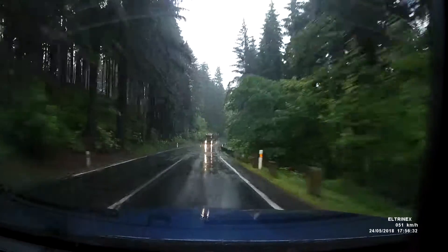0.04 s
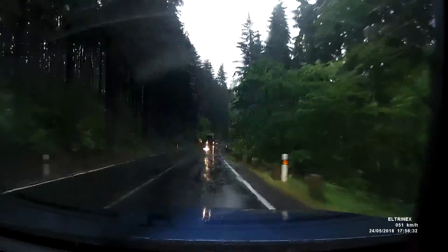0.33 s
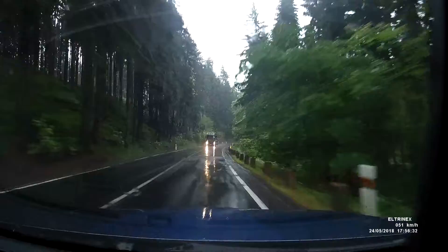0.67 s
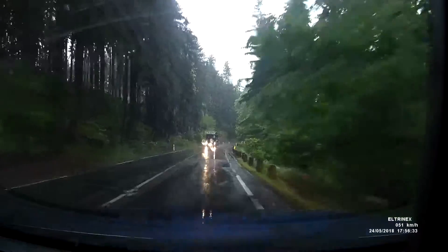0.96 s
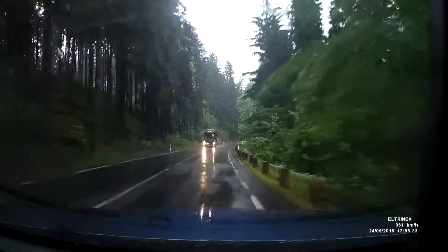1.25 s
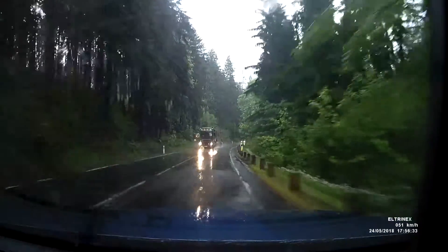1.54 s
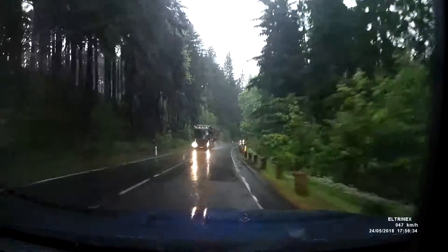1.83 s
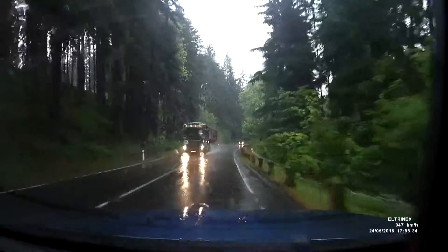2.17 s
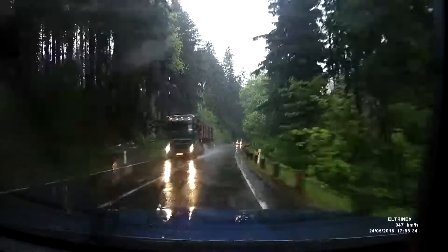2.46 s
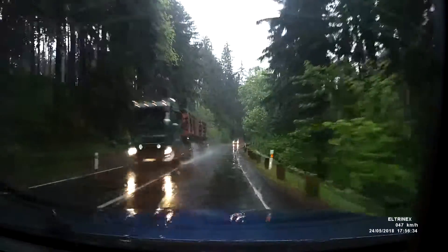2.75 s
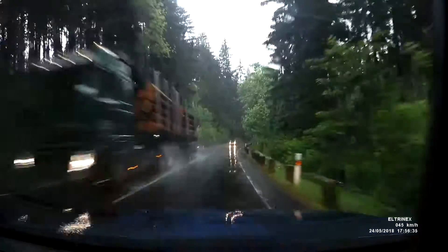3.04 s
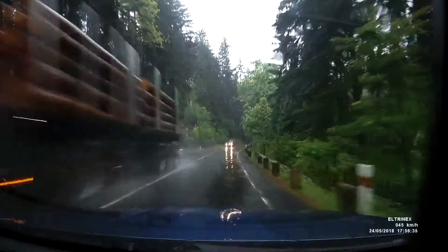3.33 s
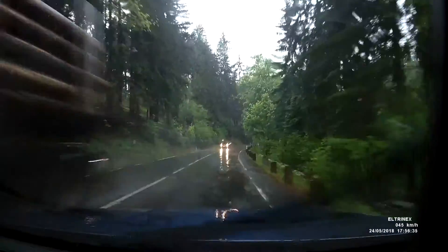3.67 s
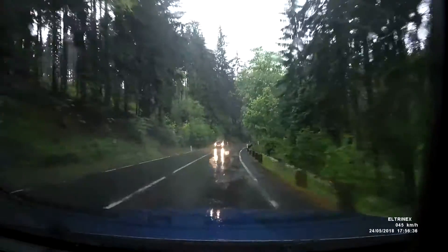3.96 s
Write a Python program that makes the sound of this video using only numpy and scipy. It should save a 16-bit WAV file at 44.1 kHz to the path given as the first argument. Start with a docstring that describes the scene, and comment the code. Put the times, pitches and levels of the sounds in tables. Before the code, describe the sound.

A car rumbles along a wet road for four seconds, heard from inside, with steady tyre hiss and raindrops ticking on the windscreen. A wiper sweep trails off at the start. The wipers drag again at about 0.9, 2.2 and 3.5 seconds, each time with a dull, juddering rub, thumps and faint squeaks. Their arms knock near 1.4 and 4 seconds. The rumble swells unevenly from about 1.3 seconds.

```python
"""A car rumbles along a wet road, heard from inside: the road shakes the body and the tyres hiss.
About every 1.3 s the wipers drag over the windscreen with a dull, juddering rub. Their rubber
thumps the glass and squeaks, and their arms knock as they turn. Raindrops tick on the glass,
and a faint electric whine lies behind it all."""
import sys
import numpy as np
from scipy import signal
from scipy.fft import rfft, irfft
from scipy.io import wavfile
from scipy.ndimage import uniform_filter1d

SR = 44100
rng = np.random.default_rng(int(sys.argv[2]) if len(sys.argv) > 2 else 0)


def dump(signal):
    """Clip the signal to [-1, 1] and save it as 16-bit WAV at the path in sys.argv[1]."""
    limited = np.clip(np.atleast_2d(signal).T, -1, 1)
    pcm = np.round(limited * 32767).astype(np.int16)
    wavfile.write(sys.argv[1], SR, pcm)


N = 176400

# How loud the driving is. Each row: time in seconds, level in dB (rumble and sway get a boost below).
RUMBLE_LEVELS = [(0, -27), (.18, -36.5), (.26, -38.5), (.9, -34), (1.25, -30), (1.33, -26), (1.43, -31.5),
                 (1.5, -24.5), (1.65, -34), (2.0, -24), (2.07, -28), (2.15, -27), (2.22, -26), (2.4, -24),
                 (2.66, -32), (2.77, -26), (2.95, -36), (3.1, -32.5), (3.45, -32), (3.72, -28.5), (4, -30)]
SWAY_LEVELS = [(0.0, -28.5), (1.26, -32), (1.4, -22.5), (1.46, -31.5), (1.53, -23.5), (2.94, -29.5),
               (2.97, -24), (3.65, -32.5), (3.69, -26), (4.0, -28)]
TYRE_LEVELS = [(0, -43.5), (.8, -44), (1.7, -44.5), (2.5, -43.5), (3.1, -43.5), (4, -42.5)]

# The tone of each sound, from low to high. Each row: frequency in Hz, relative strength in dB.
RUMBLE_TONE = [(35, -7.5), (56, -1.5), (82, 0.5), (100, -6.5), (122, -3.5), (150, -8), (200, -16.5),
               (300, -24.5), (600, -35), (1500, -68)]
SWAY_TONE = [(12, -22), (24, -0.5), (33, -1.5), (45, -5), (56, -7), (75, -29), (150, -73)]
TYRE_TONE = [(100, -24), (170, -6.5), (206, -7.5), (239, -3.5), (275, -10), (405, -10.5), (438, -12),
             (469, -11), (610, -13.5), (900, -13.5), (1060, -16.5), (1360, -14.5), (1720, -19.5),
             (2240, -39), (2600, -57), (3380, -52), (5720, -120)]
SPRAY_TONE = [(1500, 5.5), (2300, -1), (3100, 0), (4000, 2.5), (4600, 0), (5300, -14.5), (6000, -10.5),
              (8300, -13.5), (9400, -19), (11000, -23), (14000, -61.5)]
RUB_TONE = [(80, -29), (140, -1), (180, -8.5), (210, 4.5), (232, -12), (258, 1), (315, -6.5), (360, -12),
            (480, -10.5), (620, -13.5), (800, -19), (1100, -25), (1500, -27), (2100, -45), (3200, -46.5),
            (5000, -47.5), (9000, -72)]
JUMP_TONE = [(100, -21), (210, -3), (300, 1.5), (400, 4), (750, -0.5), (1100, -4), (1550, -6.5),
             (2200, -24), (3000, -28), (4400, -27.5), (5500, -41.5), (10000, -51)]
KNOCK_TONE = [(100, -33), (450, -1.5), (800, 1.5), (1150, 2.5), (1550, 10), (2100, -7), (2900, -21),
              (4400, -18), (5500, -29), (10000, -57)]
DROP_TONE = [(300, -4), (900, -4), (1550, 11.5), (2300, 2), (3100, 1), (4200, 3.5), (4700, 1.5),
             (5300, -7.5), (6500, -9), (8400, -10), (9400, -22.5), (11000, -19), (12500, -25), (14000, -37),
             (16000, -29.5)]
SPRINKLE_TONE = [(3000, -26), (5000, 7.5), (6500, 3), (8300, -5), (9400, -8), (11000, 4), (12500, -16.5),
                 (14000, -13), (16000, -27)]

# Wiper sweeps and weaker rubs. Each row: start in seconds, seconds until it fades, level in dB.
WIPER_DRAGS = [(-.05, 0.23, -42.5), (0.906, 0.3, -37.5), (1.433, 0.032, -48.5), (2.221, 0.32, -38.5),
               (2.713, 0.031, -40.5), (3.505, 0.08, -40), (3.624, 0.17, -40)]
# The blade thumps the glass. Each row: start in seconds, level in dB, pitch multiplier.
BLADE_THUMPS = [(0.930, -34, 1.2), (1.0227, -16, 1.05), (1.083, -27, 1.05), (1.134, -27, 1.05),
                (1.193, -30.5, 1.1), (2.237, -32, 1), (2.315, -29, 1.1), (2.375, -19, .95), (2.395, -25, 1),
                (2.449, -31, 1), (2.49, -27, 1.2), (3.517, -29, 1.2), (3.572, -26, 1.15), (3.624, -21, .92),
                (3.693, -27.5, 1.3), (3.751, -30, 1.3)]
# The windscreen's own notes. Each row: pitch in Hz, fade time in seconds, relative level in dB.
GLASS_NOTES = [(206.2, 0.024, -1.5), (262.3, 0.017, 0), (300, 0.02, -10)]
# Rubber squeaks. Each row: middle in seconds, pitch in Hz, level in dB.
SQUEAKS = [(.185, 497, -43.5), (1.152, 4000, -53.5), (1.21, 4060, -58), (1.37, 4050, -56), (2.24, 950, -40),
           (2.26, 4000, -57), (2.48, 4060, -56), (2.57, 4000, -60.5), (3.53, 3950, -56.5),
           (3.59, 4030, -56), (3.70, 3980, -55), (3.767, 3920, -51.5)]
# Short hits. Each row: start in seconds, level in dB, added brightness in dB per octave.
BLADE_JUMPS = [(.027, -33, 5.5), (.143, -31, -0.5), (.18, -36, -4.5), (.936, -27, -7), (.950, -32.5, -2),
               (.972, -33, -3), (1.023, -31.5, 0.5), (1.034, -32.5, 5.5), (1.0795, -27, 1),
               (1.136, -30, -6.5), (1.172, -28, -2), (1.205, -31.5, -2), (1.427, -35.5, -2),
               (2.324, -26.5, -2), (2.376, -26, 1), (2.408, -36, -7), (2.434, -29.5, 0.5),
               (2.495, -33.5, 3), (2.742, -41, -5), (3.6255, -26.5, -4), (3.633, -37, 5.5),
               (3.681, -26.5, 0), (3.708, -39, 4), (3.772, -40, 0)]
ARM_KNOCKS = [(.075, -37.5, -1), (1.389, -29.5, 0), (3.983, -32, -3), (3.996, -29, -1)]
HEAVY_DROPS = [(.074, -34.5, 2.5), (.160, -42, 1), (.43, -45, 5), (.4775, -44, 6.5), (.588, -44, 3),
               (.601, -39.5, 4.5), (.8415, -39, 2), (.930, -34.5, 3.5), (.993, -44, 5), (1.035, -38, -5),
               (1.075, -48, 7), (1.2755, -34, -0.5), (1.565, -43, 1), (1.649, -44, 3), (1.693, -42, 2),
               (1.767, -45, 5.5), (1.831, -46, 7), (2.057, -40, 0), (2.113, -44.5, 5.5), (2.364, -36, 1.5),
               (2.877, -43, 3), (2.915, -42, 3), (3.068, -52, 10), (3.204, -41.5, 2), (3.347, -39, -1),
               (3.604, -41, -6), (3.876, -43, -6), (3.957, -43, -3.5)]

RUMBLE_BOOST_DB, SWAY_BOOST_DB = 0.5, 4.5
SPRAY_DB, SPRAY_FLUTTER_DB = -61, 2.1
RAIN_DB, SPRINKLE_DB = -58, -79
ECHO_DB, WHINE_DB = -12, -87.5


def body_rumble():
    """The rough road sways the car's body and makes the cabin boom."""
    sway = steady(noise(SWAY_TONE), span_s=0.2) * curve(SWAY_LEVELS) * gain(SWAY_BOOST_DB)
    boom = steady(noise(RUMBLE_TONE), span_s=0.36) * curve(RUMBLE_LEVELS) * gain(RUMBLE_BOOST_DB)
    return sway + boom


def wipers():
    """The blades rub, squeak, thump, catch and jump; the arms knock as they turn."""
    jumps = hits(BLADE_JUMPS, JUMP_TONE, attack_s=0.0004, decay_s=0.0062, pivot_hz=746)
    knocks = hits(ARM_KNOCKS, KNOCK_TONE, attack_s=0.0004, decay_s=0.0089, pivot_hz=1200)
    return rubber_rub() + rubber_squeaks() + glass_thumps() + jumps + knocks


def rubber_rub(rise_s=0.016, fall_s=0.14, chatter_db=2.64):
    """Rubber drags unevenly over the glass."""
    t, drag = np.arange(N) / SR, 0
    for start, length, db in WIPER_DRAGS:
        rise = np.clip((t - start) / rise_s, 0, 1)
        fall = np.exp(-np.maximum(t - start - length, 0) / fall_s)
        drag += gain(db) * rise * fall
    return steady(noise(RUB_TONE), span_s=0.044) * drag * gain(chatter_db * wobble(50))


def glass_thumps(attack_s=0.0027):
    """A soft push rings the windscreen's low notes; their pitch depends on where the blade is."""
    t, out = np.arange(SR // 4) / SR, np.zeros(N + SR)
    push = 1 - np.exp(-t / attack_s)
    for start, db, pitch in BLADE_THUMPS:
        i = int(start * SR)
        for hz, decay_s, note_db in GLASS_NOTES:
            note = np.exp(-t / decay_s) * np.sin(2 * np.pi * hz * pitch * t)
            out[i:i + len(t)] += gain(db + note_db) * push * note
    return out[:N]


def rubber_squeaks(width_s=0.012, rough_db=2.5):
    """The rubber gives brief, rough squeaks, each a narrow band of noise."""
    t, out = np.arange(N) / SR, 0
    for middle, hz, db in SQUEAKS:
        squeak = signal.lfilter(*signal.iirpeak(hz, Q=20, fs=SR), rng.standard_normal(N))
        swell = np.exp(-((t - middle) / width_s) ** 2)
        out += steady(squeak, span_s=0.015) * gain(db) * swell
    return out * gain(rough_db * wobble(300))


def tyres():
    """The tread roars evenly; the spray flutters with the water on the road."""
    roar = steady(noise(TYRE_TONE), span_s=0.18) * curve(TYRE_LEVELS)
    spray = noise(SPRAY_TONE) * gain(SPRAY_DB + SPRAY_FLUTTER_DB * wobble(44.6))
    return roar + spray


def rain():
    """Many small drops, a fine bright sprinkle and a few heavy drops tick on the windscreen."""
    small = patter(DROP_TONE, per_s=400) * gain(RAIN_DB)
    sprinkle = patter(SPRINKLE_TONE, per_s=18) * gain(SPRINKLE_DB)
    heavy = hits(HEAVY_DROPS, DROP_TONE, attack_s=0.00015, decay_s=0.0015, pivot_hz=3500)
    return small + sprinkle + heavy


def patter(tone, per_s, scatter_db=5, range_db=14.5, splash_s=0.0015):
    """Drops of mixed sizes land at random, each a click with a brief splash."""
    lands = rng.random(N) < per_s / SR
    size_db = (scatter_db * rng.exponential(size=N)) % range_db
    clicks = lands * gain(size_db) * rng.choice([-1, 1], N)
    fade = 2 / (splash_s * SR)
    splash = np.sqrt(signal.lfilter([fade], [1, -np.exp(-fade)], clicks ** 2))
    return unit(colour(clicks + splash * rng.standard_normal(N), tone))


def cabin_echo(x, decay_s=0.0067):
    """The small, padded cabin adds a dense echo that dies quickly."""
    t = np.arange(SR // 5) / SR
    tail = rng.standard_normal(len(t)) * np.exp(-t / decay_s)
    return gain(ECHO_DB) * signal.fftconvolve(x, tail / np.linalg.norm(tail))[:N]


def electric_whine(hz=7882):
    """One faint, high, steady note."""
    return np.sqrt(2) * gain(WHINE_DB) * np.sin(2 * np.pi * hz * np.arange(N) / SR)


def hits(rows, tone, attack_s, decay_s, pivot_hz):
    """Each hit is a short, dying burst of noise with its own loudness and brightness."""
    t, force = np.arange(SR // 10) / SR, np.zeros(N + SR)
    shape = np.exp(-t / decay_s) * (1 - np.exp(-t / attack_s))
    octaves = np.log2(np.clip(np.fft.rfftfreq(len(t), 1 / SR) / pivot_hz, 1 / 4, 4))
    for start, db, tilt in rows:
        burst = rfft(shape * rng.standard_normal(len(t)))
        burst /= np.sqrt(uniform_filter1d(abs(burst) ** 2, size=50))  # even out chance peaks
        burst *= np.linalg.norm(shape) * gain(db + tilt * octaves)
        i, kept = int(start * SR), len(t) // 2
        force[i:i + kept] += irfft(burst)[:kept]
    return colour(force[:N], tone)


def colour(x, tone):
    """Filter a sound to the given tone; white noise keeps its power."""
    hz, db = np.array(tone, float).T
    log_hz = np.log(np.maximum(np.arange(N + 1) * SR / (2 * N), 1))
    beyond = np.maximum(log_hz - np.log(hz[-1]), 0) + np.maximum(np.log(hz[0]) - log_hz, 0)
    shape_db = np.interp(log_hz, np.log(hz), db) - 30 * beyond
    # Make the filter ring only after a hit, never before it.
    cepstrum = irfft(np.log(unit(gain(shape_db))))
    cepstrum[1:N] *= 2
    cepstrum[N + 1:] = 0
    return irfft(rfft(x, 2 * N) * np.exp(rfft(cepstrum)))[:N]


def noise(tone):
    """Noise with the given tone, at level 1."""
    return unit(colour(rng.standard_normal(N), tone))


def wobble(per_s):
    """A smooth random wander of about 1 either way."""
    k = int(SR / per_s)
    steps = np.repeat(rng.standard_normal(N // k + 1), k)
    return unit(uniform_filter1d(uniform_filter1d(steps, k), k)[:N])


def steady(x, span_s):
    """Even out the slow swells of a noise."""
    return x / np.sqrt(uniform_filter1d(x ** 2, int(span_s * SR)))


def curve(rows):
    """A volume that glides from row to row."""
    return gain(np.interp(np.arange(N) / SR, *np.array(rows).T))


def gain(db):
    """Turn decibels into a multiplier."""
    return 10 ** (np.asarray(db) / 20)


def unit(x):
    """Scale to an average (rms) level of 1."""
    return x / np.sqrt(np.mean(x ** 2))


def scene():
    """Mix everything in one channel; only the wipers and rain get an echo."""
    glass = wipers() + rain()
    return (body_rumble() + tyres() + glass + cabin_echo(glass) + electric_whine())[None]


def record(dry):
    """Cut the treble above 15000 Hz."""
    return signal.sosfilt(signal.ellip(8, .2, 70, 15000, fs=SR, output="sos"), dry)


dry = scene()
out = record(dry)
dump(out)
```